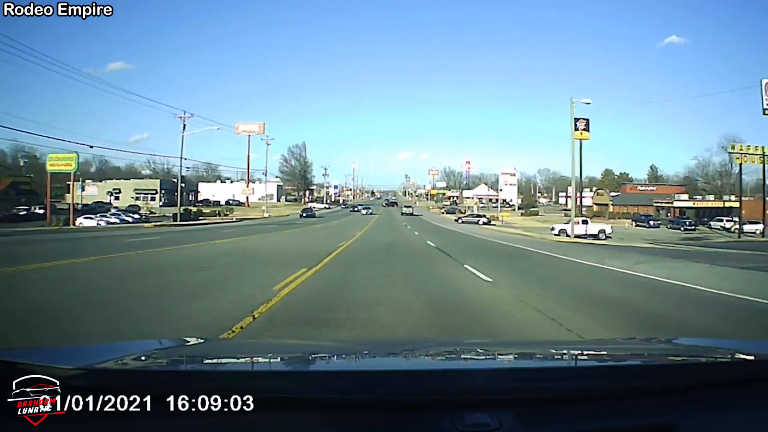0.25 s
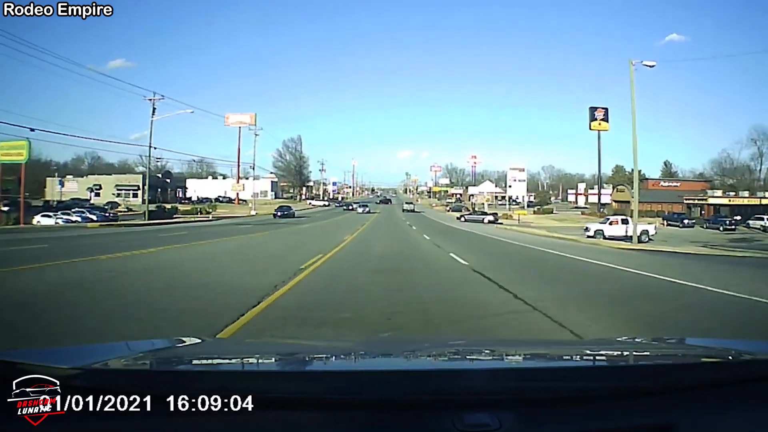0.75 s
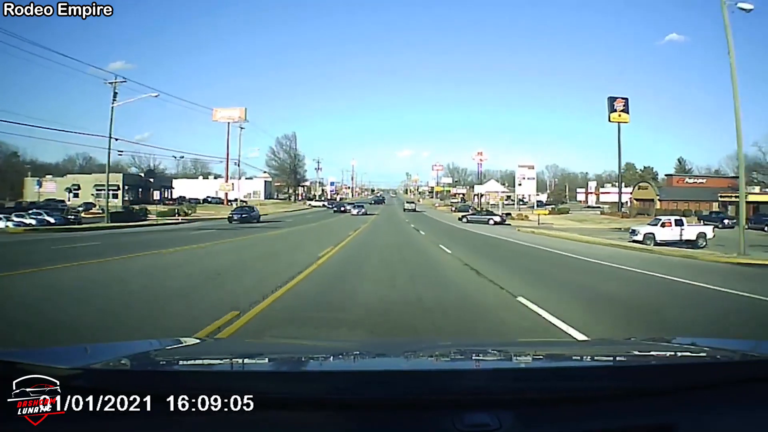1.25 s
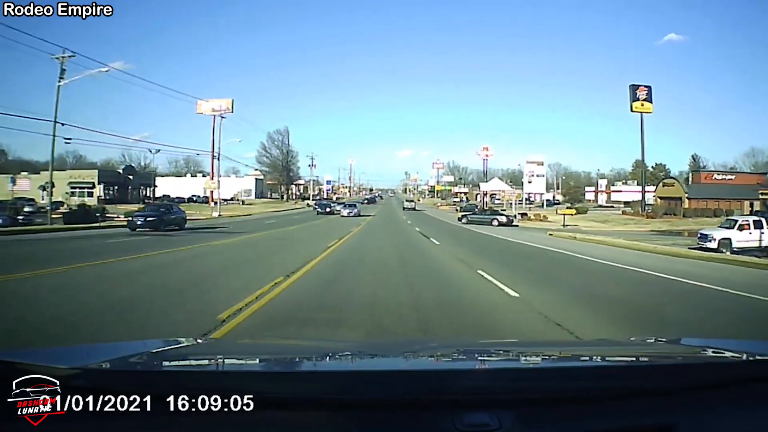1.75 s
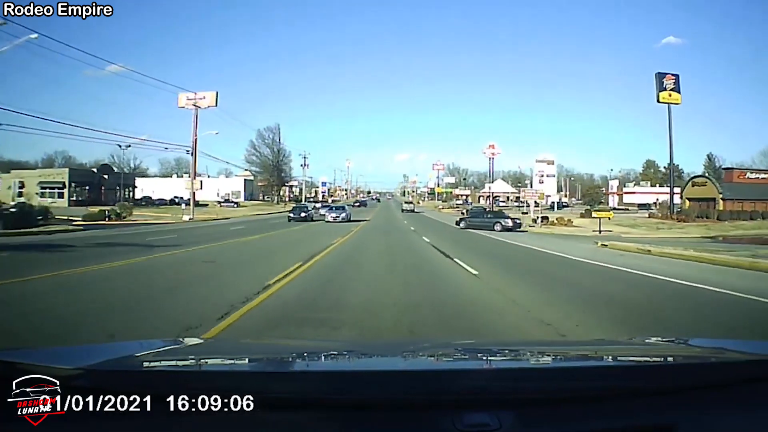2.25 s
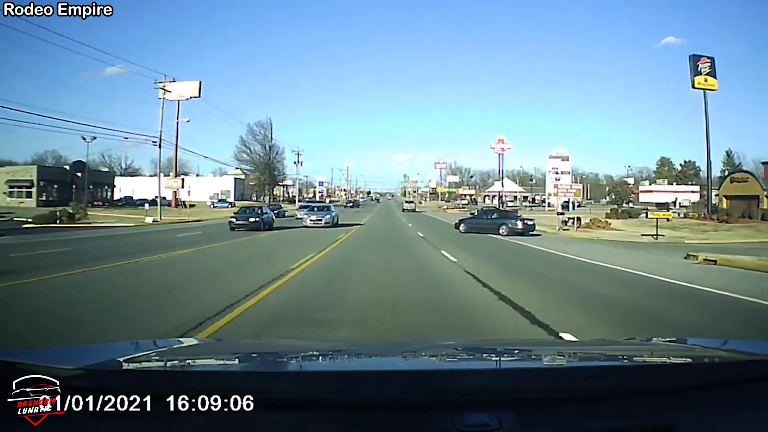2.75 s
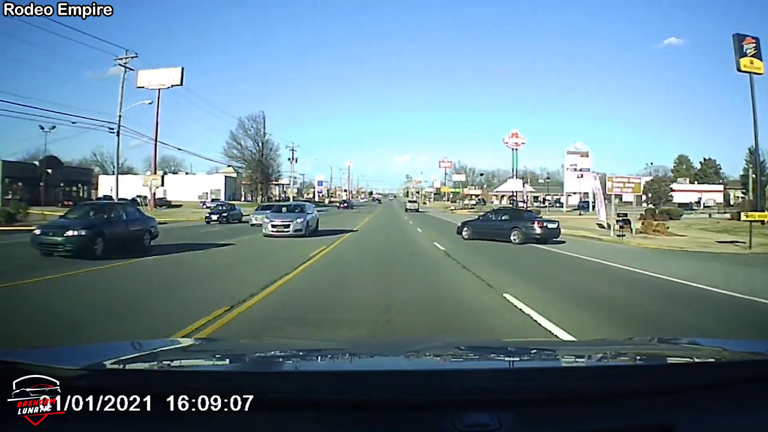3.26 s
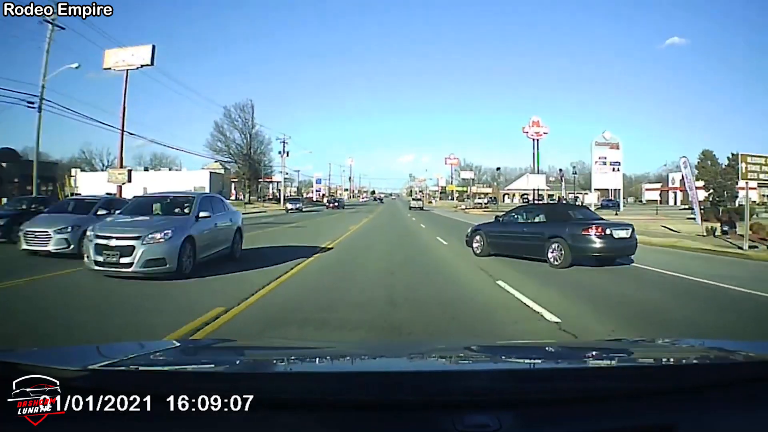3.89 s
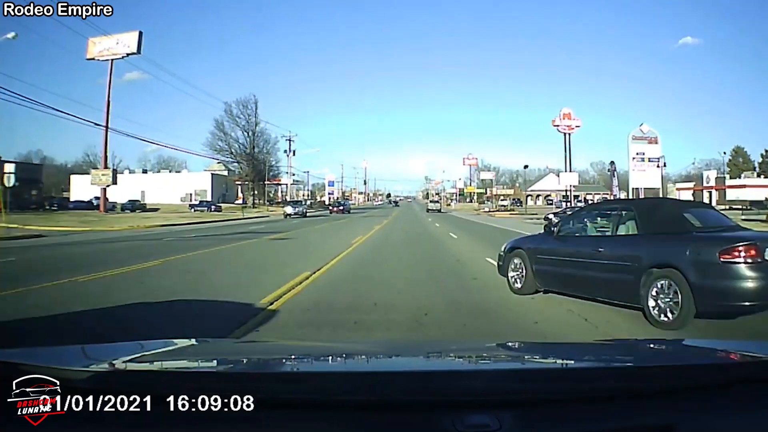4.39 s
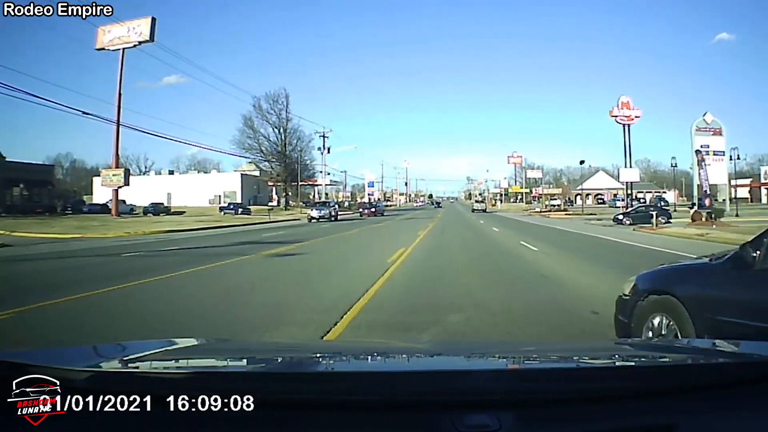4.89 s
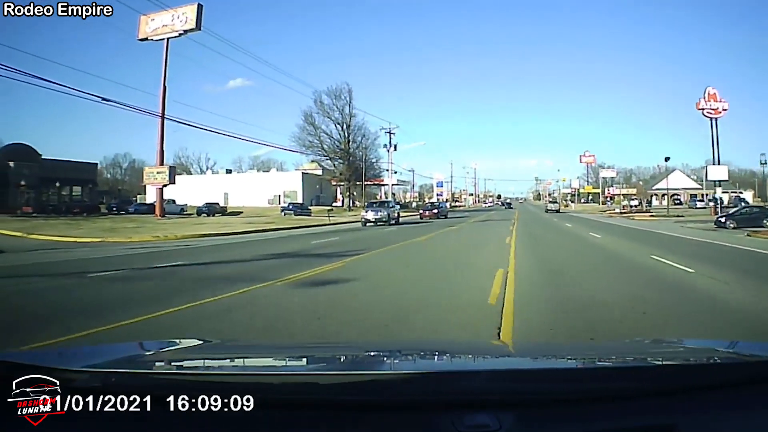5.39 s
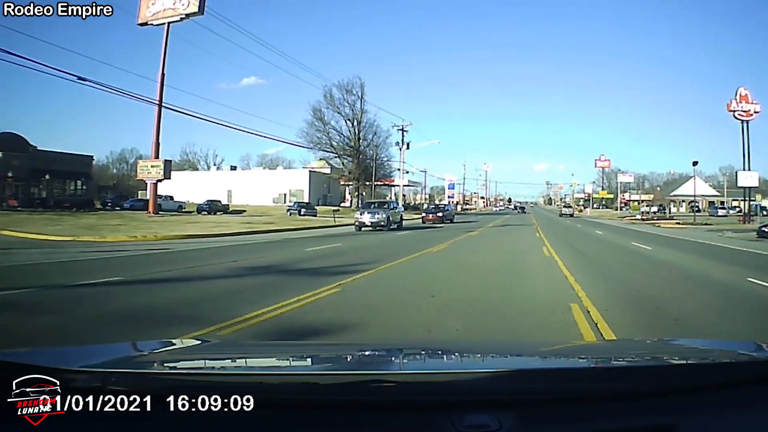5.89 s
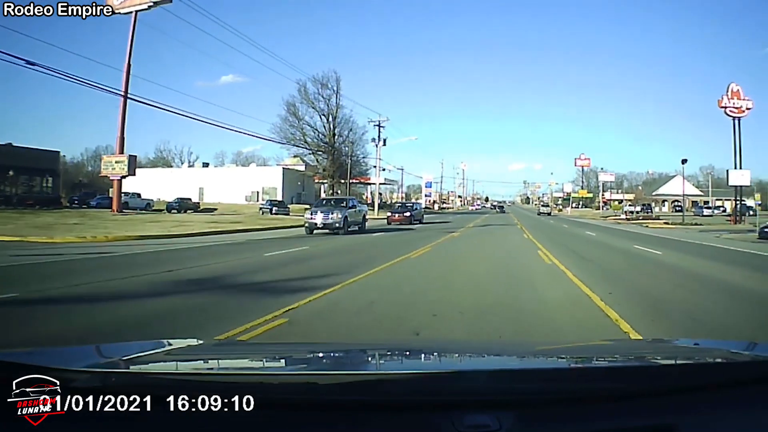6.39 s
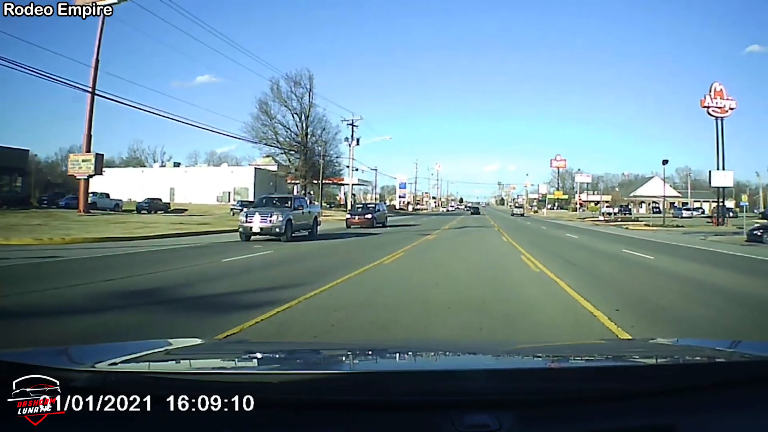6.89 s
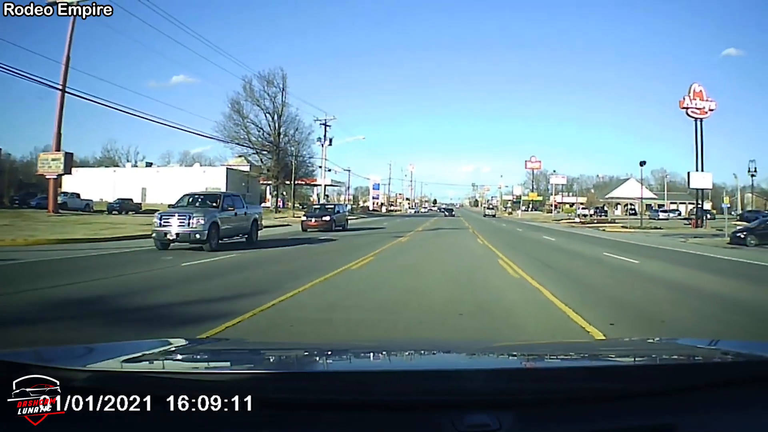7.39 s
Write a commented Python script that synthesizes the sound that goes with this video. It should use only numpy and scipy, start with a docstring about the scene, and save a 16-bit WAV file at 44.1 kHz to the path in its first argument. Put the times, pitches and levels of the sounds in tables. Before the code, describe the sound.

Inside a moving car, low rumble and tyre roar, then heavy thumps and rattling clicks during a swerve, and one long two-note horn blast.

```python
"""Inside a car on a town road, heard from a small camera at the windscreen, with its own faint hiss and whine.
Noise shaped into rumble, roar and rushing air is the drive; from 1.6 s rows of taps make the camera mount chatter.
At 4.3 s the car brakes and swerves: slow swings thump the body, and noise bursts slide, knock, click and crackle.
From 5.4 to 7.0 s two stacks of sines sound one long horn blast, while an object lands and plastic clacks.
From 6.2 s the car slows and its road noise fades; the horn rings out with a short rattle."""
import sys
import numpy as np
from scipy import signal
from scipy.fft import rfft, irfft, next_fast_len
from scipy.io import wavfile
from scipy.ndimage import map_coordinates

SR = 44100
rng = np.random.default_rng(int(sys.argv[2]) if len(sys.argv) > 2 else 0)


def materialize(psi):
    """Save the field psi as 16-bit PCM at rate SR to the path in sys.argv[1].

    A 1-D psi becomes a single channel; in a 2-D psi each row is a channel.
    """
    bounded = np.clip(np.atleast_2d(psi).T, -1, 1)
    quanta = np.round(bounded * 32767).astype(np.int16)
    wavfile.write(sys.argv[1], SR, quanta)


N = 337365
TIME = np.arange(N) / SR

# Noise colours, of which only the shape counts: (frequency [Hz], relative level per Hz [dB])
# microphone hiss
HISS = [(2200, -1.5), (3000, 1), (4000, -2.5), (5800, -1), (7000, -3), (10000, -3), (13500, -4),
        (15200, -2.5)]
# low shaking of the car body
RUMBLE = [(10, 4), (17, 3), (24, -7), (32, -5), (42, 1.5), (52, -4), (65, -9.5), (80, -12.5), (105, -14.5),
          (130, -22.5)]
# tyre roar in the cabin
ROAR = [(76, -30), (130, 2.5), (216, -3.5), (252, -10), (344, -7), (404, -11.5), (492, -17), (539, -13),
        (700, -27), (910, -55.5), (1540, -120)]
# rush of air
WIND = [(410, -34), (700, -2.5), (791, -5), (996, -3.5), (1150, -7.5), (1260, -11.5), (1560, -12),
        (2060, -22), (3000, -31), (3900, -55.5), (6600, -120)]
# something sliding over the dashboard
SLIDE_COLOUR = [(180, -28.5), (300, 2), (447, -5), (499, -8), (549, -13), (807, -9.5), (1220, -19),
                (1580, -19.5), (2030, -31.5), (3280, -22), (3560, -31.5), (8000, -54), (10400, -76),
                (17600, -120)]
# rasp of the horn diaphragms
RASP_COLOUR = [(900, -14), (1600, 1), (2100, -6), (2700, 1), (3400, -5), (4200, -11), (8000, -21.5)]

# Roughness of the road surface, as body rumble: (time [s], relative level [dB])
SURFACE = [(0.0, -27), (2.51, -29.5), (2.57, -31.5), (4.3, -28.5)]
TYRES_DB = -41.5  # tyre roar at cruising speed, before the trims in road()
# Braking loads the springs, so the body rumbles more
BRAKE_S, BRAKE_RISE_S, BRAKE_DB = 4.28, 0.17, 3.5
# Then the car loses speed, and the road noise falls with it
SLOWING_S, RUMBLE_FALL_DB_PER_S, ROAR_FALL_DB_PER_S = 6.22, 8, 10

# Heavy swings of the body: (middle [s], pitch [Hz], peak level [dB], half length [s])
THUMPS = [(4.453, 20, -1.5, 0.049), (4.538, 8.1, -4, 0.039), (4.545, 55, -17, 0.017),
          (4.903, 40, -13, 0.021), (5.629, 54, 0, 0.0094), (5.651, 58, -1, 0.0088),
          (5.826, 64, -16, 0.0143)]

# Rough patches that set the mount tapping its stop:
# (start [s], length [s], time to the hardest tap [s], gap between taps [s], hardest tap, relative [dB])
PATCHES = [(1.5778, 0.19, 0.108, .01992, -33), (1.835, 0.21, 0.12, 0.02, -36),
           (2.3877, 0.054, .002, .0189, -35.5)]
# Taps are weaker by this much at the edges of a patch, and vary up or down by chance
TAP_EDGE_DB, TAP_SCATTER_DB = 6, 1.5
# Ringing of the camera's plastic shell: (pitch [Hz], relative level [dB], time to fall 60 dB [s])
SHELL = [(280, 2.5, 0.015), (716, -8, 0.0085), (1060, -16, 0.0066), (1400, -22.5, 0.0039)]

# Loudness of the slide: (time [s], relative level [dB])
SLIDE = [(4.3, -56.5), (4.5, -58), (4.6, -54), (4.68, -50), (4.78, -42), (4.83, -49), (4.87, -61),
         (5.05, -61), (5.3, -86)]
# Dull knocks of loose things, and at 5.63 and 5.65 s two short crackles as the recorder overloads on the thumps:
# (time [s], starting level [dB], lower edge [Hz], upper band against lower band [dB], time to fall 60 dB [s])
KNOCKS_AND_CRACKLES = [(4.513, -41, 300, -26, .04), (4.525, -34, 120, -25, 0.056),
                       (4.786, -38, 200, -12, .05), (4.909, -32.5, 600, -17, .016),
                       (5.626, -35, 200, -17, .045), (5.649, -37, 200, -26, .027),
                       (5.811, -34, 180, -14, 0.1), (6.162, -28.5, 450, -10, .025)]
# The lower band reaches up to the first pitch, the upper band from there to the second
LOWER_TOP_HZ, UPPER_TOP_HZ = 1620, 5400
# Small hard things that click and bounce:
# (time [s], starting level [dB], centre [Hz], loss per bounce [dB])
CLICKS = [(4.322, -59, 4400, 1), (4.480, -59, 5000, 4), (5.231, -56.5, 3000, 8), (5.325, -42.5, 3500, 1),
          (5.397, -41, 3300, 20), (5.848, -53, 4760, 8), (5.924, -47.5, 4670, 14), (6.353, -55, 5000, 8)]
# Width and decay of every click, and the gap between its touches
CLICK_OCTAVES, CLICK_T60_S, BOUNCE_S = 0.87, 0.027, .0105
# Fainter clicks come at random while the car swerves
SWERVE_S, RATTLES_PER_S, RATTLE_DB, RATTLE_HZ = (4.4, 6), 3.1, -63, 4800
# A heavy object lands against the trim, which rings:
# (pitch [Hz], starting level [dB], time to fall 60 dB [s])
LANDING_S = 5.813
TRIM = [(131, -14, 0.14), (253, -15.5, 0.11), (280, -37, 0.028)]
# Hard plastic clacks once and rings: (pitch [Hz], starting level [dB], time to fall 60 dB [s])
CLACK_S = 6.1605
PLASTIC = [(3330, -32, 0.022), (5250, -44.5, .028)]

HORN_ON_S, HORN_OFF_S = 5.408, 7.037
# Course of each horn: (time [s], pitch [Hz], relative level [dB])
LOW_HORN = [(5.43, 404.2, -4), (5.55, 402.2, -0.5), (5.9, 402.3, -1), (6.25, 402.4, 0), (6.55, 402.4, .5),
            (7.0, 402.8, -0.5), (7.06, 401, -0.5)]
HIGH_HORN = [(5.43, 501.6, 0), (5.52, 499, 0), (5.7, 496.8, 1), (6.1, 498.2, 0.68), (6.48, 497.6, -1),
             (6.57, 494.8, 0), (7.06, 496.3, 1)]
# Strength of their partials, read as a curve at each whole multiple:
# (multiple of the pitch [times], relative level in the swerve [dB], relative level after it [dB])
LOW_PARTIALS = [(1, -44, -42.5), (2, -48, -49), (3, -52.5, -52), (4, -45, -45.5), (5, -56, -55.5),
                (6, -48.5, -47), (6.94, -59, -58), (8, -70, -62), (8.97, -69.5, -65), (10, -79.5, -79),
                (11, -82, -89), (13, -80, -87), (15, -93, -96), (16, -78.5, -87), (17, -98, -93),
                (18, -84, -82), (19, -99, -86), (20, -82, -88), (22, -96, -92.5)]
HIGH_PARTIALS = [(1, -40.5, -41.5), (2, -47.5, -43), (3, -63, -59), (4, -64, -59), (5, -56.5, -58.5),
                 (6, -59.5, -60), (7, -63, -60), (8, -76.5, -73.5), (9, -81, -87), (10, -80, -83),
                 (11, -96.5, -93), (12, -96.5, -92.5), (14, -88, -94), (17, -96.5, -93.5)]
# How far the car has straightened: (time [s], share [0-1])
STRAIGHT = [(6.2, 0.26), (6.55, 0.98)]
# Late in the blast the high horn's cycles are alternately strong and weak, which adds in-between partials:
# (multiple of the pitch [times], relative level [dB])
HALF_PARTIALS = [(3.5, -80), (4.5, -85), (5.5, -68), (7.5, -77), (8.5, -79), (10.5, -83)]
ALTERNATION_S, ALTERNATION_RISE_S = 6.38, .1

CUTOFF_HZ = 15400  # top of the recorder's range


def from_db(db):
    """Turn decibels into a factor."""
    return 10 ** (np.asarray(db) / 20)


def rms_one(x):
    """Scale a sound to an average (rms) strength of 1."""
    return x / np.sqrt(np.mean(x ** 2) + 1e-20)


def in_time(rows):
    """Read the columns of a time curve at every sample."""
    s, *columns = np.transpose(rows)
    return [np.interp(TIME, s, c) for c in columns]


def filtered(x, hz, kind, order=2):
    """Keep only part of the pitch range (Butterworth filter)."""
    edges = np.clip(hz, 5, .45 * SR)
    return signal.sosfilt(signal.butter(order, edges, kind, fs=SR, output="sos"), x + 1e-18)


def drift(rate):
    """Wander smoothly by chance, with rms 1, changing about `rate` times a second."""
    knots = rng.standard_normal(2000)
    return rms_one(map_coordinates(knots, [TIME * rate], order=2, mode="mirror"))


def noise(spectrum):
    """Make noise of rms 1 with the given colour, falling steeply beyond its ends."""
    hz, db = np.transpose(spectrum)
    size = next_fast_len(N)
    octave = np.log2(np.arange(size // 2 + 1) * SR / size + 1e-3)
    points = np.log2(hz)
    octaves_beyond = np.abs(octave - np.clip(octave, points[0], points[-1]))
    gain = from_db(np.interp(octave, points, db) - 30 * octaves_beyond)
    white = rfft(rng.standard_normal(size))
    return rms_one(irfft(white * gain, size)[:N])


def dying(start, t60):
    """Jump to 1 at the start, then fall by 60 dB every t60 seconds."""
    return (TIME >= start) * from_db(-60 * np.clip((TIME - start) / t60, 0, 4))


def electronics(hiss_db=-70, whine_hz=5766, whine_db=-78):
    """The camera's own circuits give a steady hiss and a thin whine."""
    whine = np.sqrt(2) * np.sin(2 * np.pi * whine_hz * TIME)
    return from_db(hiss_db) * noise(HISS) + from_db(whine_db) * whine


def body_shudder(shudder_db=-29, shudder_s=0.22):
    """Loudness of the panels, which shudder with every heavy swing and die away."""
    shudder = np.zeros(N)
    for s, hz, db, half in THUMPS:
        rise = np.clip((TIME - s + half) / half, 0, 1)
        shudder += from_db(db + shudder_db) * rise * dying(s - half, shudder_s)
    return shudder


def road(rumble_db=3.5, roar_db=-2, flutter_db=1.6, wind_db=-38, wind_share=0.58):
    """The road shakes the body and roars in the tyres; rushing air fades more gently as the car slows."""
    braking = np.clip((TIME - BRAKE_S) / BRAKE_RISE_S, 0, 1)
    slowing = np.maximum(TIME - SLOWING_S, 0)
    body = in_time(SURFACE)[0] + BRAKE_DB * braking - RUMBLE_FALL_DB_PER_S * slowing
    tyres = TYRES_DB - ROAR_FALL_DB_PER_S * slowing
    rumble = from_db(body + rumble_db) * noise(RUMBLE)
    roar_gain = from_db(tyres + roar_db + flutter_db * drift(14))
    # the shuddering panels share the colour of the roar
    roar = (roar_gain + body_shudder()) * noise(ROAR)
    wind = from_db(wind_db + wind_share * tyres) * noise(WIND)
    return rumble + roar + wind


def thumps():
    """The heavy body heaves on its springs in short, slow swings."""
    out = np.zeros(N)
    for s, hz, db, half in THUMPS:
        swell = np.exp(-np.minimum(((TIME - s) / half) ** 2, 50))
        out -= from_db(db) * swell * np.cos(2 * np.pi * hz * (TIME - s))
    return out


def taps():
    """The mount meets its stop in evenly spaced contacts, weaker away from the hardest tap."""
    contacts = np.zeros(N)
    for start, length, hardest, gap, db in PATCHES:
        t = gap * np.arange(round(length / gap) + 1)
        # a patch whose hardest tap comes at once has no weak start
        first_db = -TAP_EDGE_DB * (hardest > gap)
        swell = np.interp(t, [0, hardest, length], [first_db, 0, -TAP_EDGE_DB])
        scatter = TAP_SCATTER_DB * rng.uniform(-1, 1, len(t))
        contacts[np.round((start + t) * SR).astype(int)] = from_db(db + swell + scatter)
    return contacts


def ring(contacts, hz, t60):
    """Each contact sets a fading sine ringing; one of strength 1 starts it at height 1."""
    r = from_db(-60 / (t60 * SR))
    w = 2 * np.pi * hz / SR
    return signal.lfilter([0, np.sin(w)], [1, -2 * r * np.cos(w), r * r], contacts + 1e-18)


def mount(swing_db=17.0, swing_hz=85, swing_s=0.0079, stop_s=0.0005, settle_s=0.0076, stop_share=0.35,
          top_hz=4800, scatter_db=8.0):
    """The camera swings smoothly, is checked abruptly by its stop, and settles while its shell rings."""
    t = np.arange(-1000, 1000) / SR  # time around one contact
    swing = np.cos(2 * np.pi * swing_hz * t) * np.exp(-(t / swing_s) ** 2)
    stop = stop_share * np.exp(-np.abs(t) / stop_s)
    settle = (1 - stop_share) * np.exp(-np.abs(t) / settle_s)
    movement = np.where(t < 0, swing, stop + settle)
    contacts = taps()
    jolts = -from_db(swing_db) * signal.fftconvolve(contacts, movement, "same")
    shell = np.zeros(N)
    for hz, db, t60 in SHELL:
        # every tap strikes each tone of the shell with a strength of its own
        strength = from_db(db + scatter_db * rng.standard_normal(N))
        shell += ring(contacts * strength, hz, t60)
    return filtered(jolts + shell, top_hz, "low", order=4)


def slide(slide_db=1.0, grain_db=1.5):
    """Something rubs over the dashboard: noise with a fine, grainy flutter."""
    sliding = (TIME > SLIDE[0][0]) & (TIME < SLIDE[-1][0])
    level = in_time(SLIDE)[0] + slide_db + grain_db * drift(150)
    return sliding * from_db(level) * noise(SLIDE_COLOUR)


def burst(s, db, low_hz, high_hz, t60):
    """A band of noise that starts at once and dies away."""
    out = np.zeros(N + SR)
    t = np.arange(SR // 4) / SR
    at = round(s * SR)
    band = filtered(rng.standard_normal(len(t)), sorted([low_hz, high_hz + 1]), "band", order=4)
    out[at:at + len(t)] = rms_one(band) * from_db(db - 60 * t / t60)
    return out[:N]


def knocks_and_crackles():
    """Dull knocks of loose things and two overload crackles, each a lower band with a fainter one above."""
    out = np.zeros(N)
    for s, db, low_hz, upper_db, t60 in KNOCKS_AND_CRACKLES:
        out += burst(s, db, low_hz, LOWER_TOP_HZ, t60)
        out += burst(s, db + upper_db, LOWER_TOP_HZ, UPPER_TOP_HZ, t60)
    return out


def clicks():
    """Small things touch three times, weaker at each bounce, amid a faint random rattle."""
    touches = [(s + k * BOUNCE_S, db - k * loss_db, hz) for s, db, hz, loss_db in CLICKS for k in range(3)]
    start, end = SWERVE_S
    rattle_times = rng.uniform(start, end, round(RATTLES_PER_S * (end - start)))
    touches += [(s, RATTLE_DB, RATTLE_HZ) for s in rattle_times]
    spread = 2 ** (CLICK_OCTAVES / 2)
    return sum(burst(s, db, hz / spread, hz * spread, CLICK_T60_S) for s, db, hz in touches)


def struck(s, modes):
    """One blow sets all of an object's own tones ringing."""
    return sum(from_db(db) * dying(s, t60) * np.sin(2 * np.pi * hz * (TIME - s)) for hz, db, t60 in modes)


def short_noises():
    """A grainy slide, knocks, crackles and clicks, one hollow landing and one sharp clack."""
    landing = struck(LANDING_S, TRIM)
    clack = struck(CLACK_S, PLASTIC)
    return slide() + knocks_and_crackles() + clicks() + landing + clack


def cabin(x, t60=.14, wet_db=-8):
    """Glass and trim throw back dense, short reflections."""
    t = np.arange(SR // 3) / SR
    tail = rng.standard_normal(len(t)) * from_db(-60 * t / t60) * (t > .002)
    reflections = signal.fftconvolve(x, tail / np.linalg.norm(tail))[:N]
    return x + from_db(wet_db) * reflections


def horn_rasp(rasp_db=-69, release_db=-53, ring_s=0.15):
    """The diaphragms rasp faintly, and rattle once the current stops."""
    held = (TIME > HORN_ON_S) & (TIME < HORN_OFF_S)
    level = from_db(rasp_db) * held + from_db(release_db) * dying(HORN_OFF_S, ring_s)
    return level * noise(RASP_COLOUR)


def horn(curve, partials, level_db, jitter_hz, waver_db, half_partials=(), rise_s=0.017, ring_s=0.2):
    """A buzzing diaphragm drives a flared pipe; each partial wavers as the reflections from the road change."""
    pitch, db = in_time(curve)
    straight, = in_time(STRAIGHT)
    phase = 2 * np.pi * np.cumsum(pitch + jitter_hz * drift(120)) / SR
    fade = -60 * np.clip((TIME - HORN_OFF_S) / ring_s, 0, 3)  # in dB, after the release
    multiples, early, late = np.transpose(partials)
    out = np.zeros(N)
    for k in range(1, round(multiples[-1]) + 1):
        early_db = np.interp(k, multiples, early)
        late_db = np.interp(k, multiples, late)
        level = (1 - straight) * early_db + straight * late_db
        # high partials waver more; all are steadier once the car is straight
        waver = waver_db * k ** 0.2 * (1 - .5 * straight) * drift(11)
        # high partials build up later and ring out sooner
        swell = np.clip((TIME - HORN_ON_S) / (rise_s * k ** 0.33), 0, 1) ** 2
        tone = np.sin(k * phase + rng.uniform(0, 2 * np.pi))
        out += swell * from_db(level + fade * k ** 0.49 + waver) * tone
    alternating = np.clip((TIME - ALTERNATION_S) / ALTERNATION_RISE_S, 0, 1) * from_db(2 * fade)
    for k, level in half_partials:
        out += alternating * from_db(level) * np.sin(k * phase + rng.uniform(0, 2 * np.pi))
    return np.sqrt(2) * from_db(db + level_db) * out  # the root of 2 gives each sine an rms of 1


def scene():
    """Add up everything that is heard."""
    inside = cabin(short_noises(), t60=0.14, wet_db=-8.5)
    low = horn(LOW_HORN, LOW_PARTIALS, level_db=0, jitter_hz=0.57, waver_db=1.0)
    high = horn(HIGH_HORN, HIGH_PARTIALS, level_db=-1, jitter_hz=0.42, waver_db=1.6,
                half_partials=HALF_PARTIALS)
    return (electronics() + road() + thumps() + mount() + inside + horn_rasp() + low + high)[None]


def record(dry, top=0.8):
    """The heaviest thumps flatten against the recorder's limit; the ends are softened and the top is cut."""
    limited = dry / (1 + (dry / top) ** 8) ** (1 / 8)
    ends = np.clip(np.minimum(TIME, TIME[-1] - TIME) / .005, 0, 1)
    top_cut = signal.ellip(10, .1, 80, CUTOFF_HZ, fs=SR, output="sos")
    return signal.sosfilt(top_cut, limited * ends)


dry = scene()
out = record(dry)
materialize(out)
```